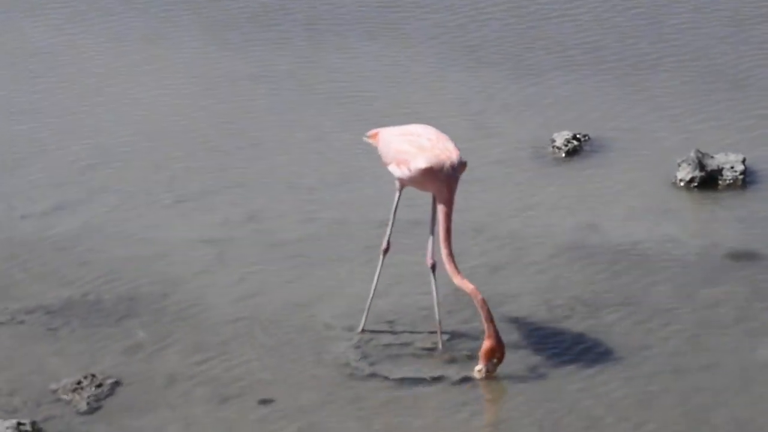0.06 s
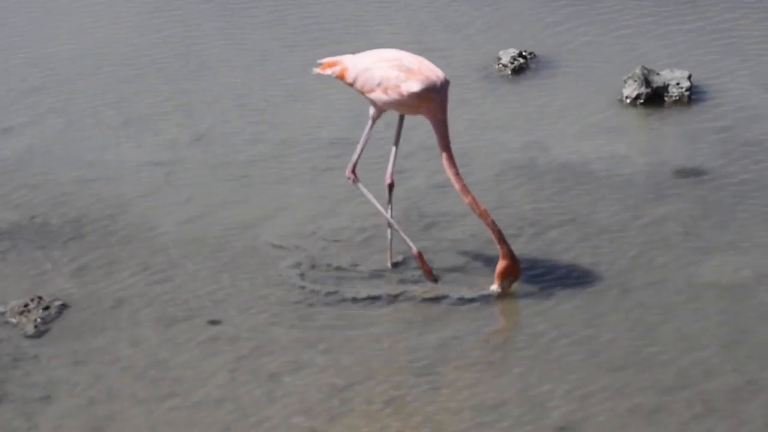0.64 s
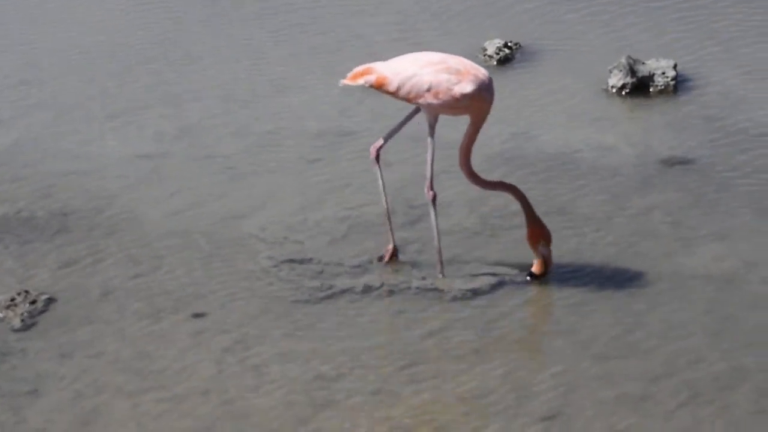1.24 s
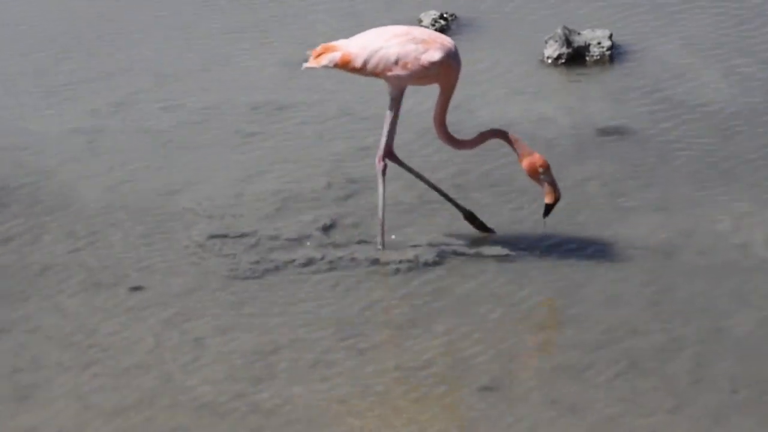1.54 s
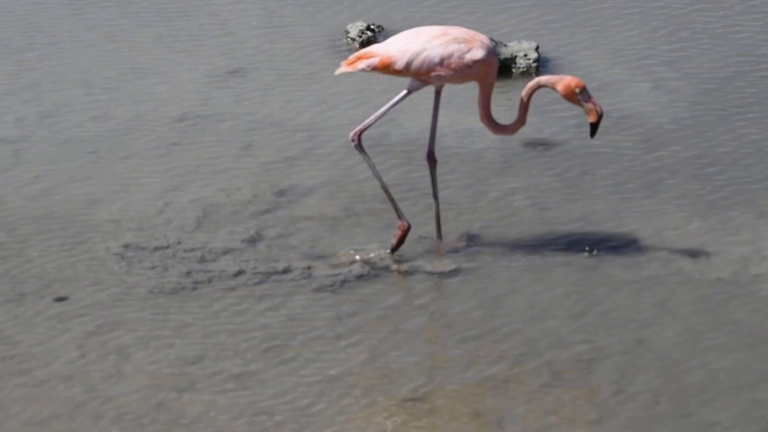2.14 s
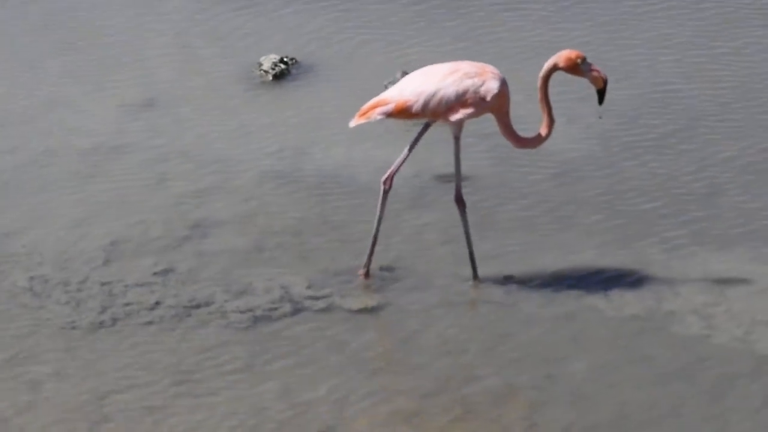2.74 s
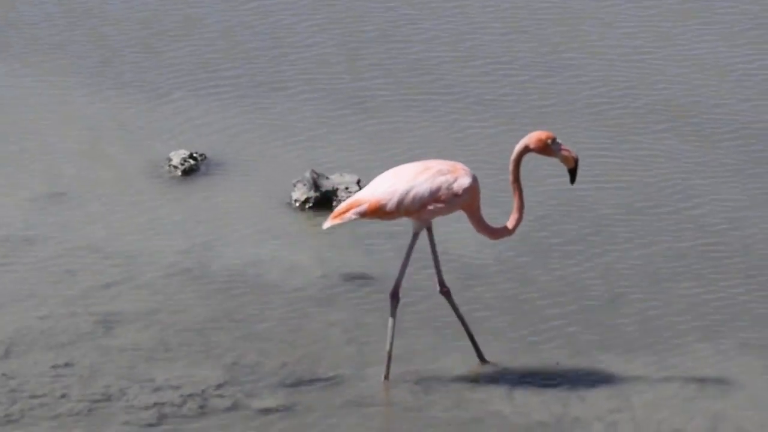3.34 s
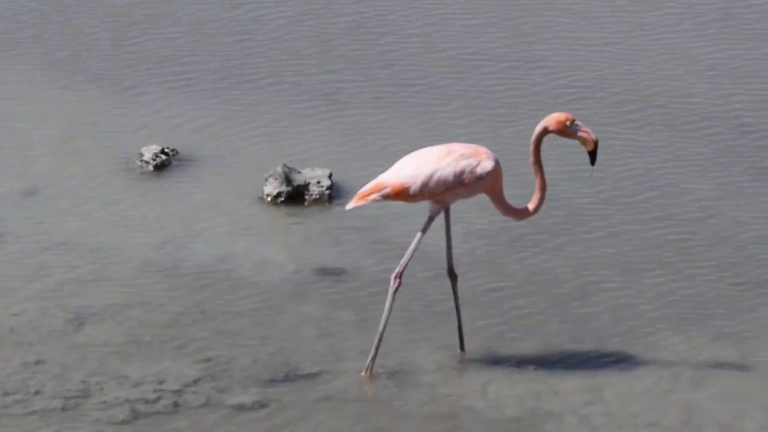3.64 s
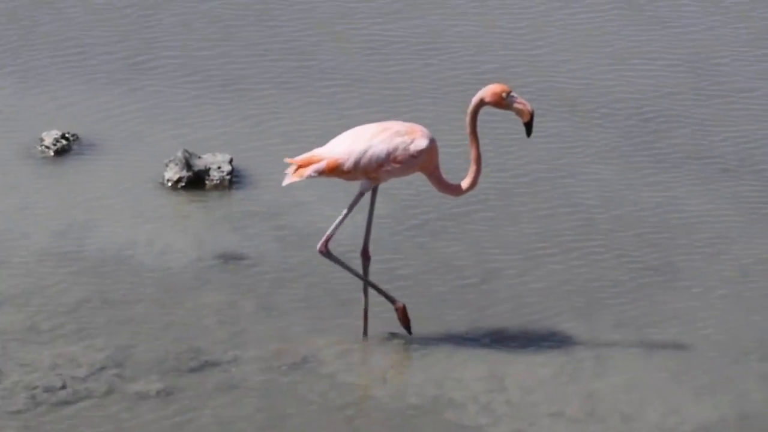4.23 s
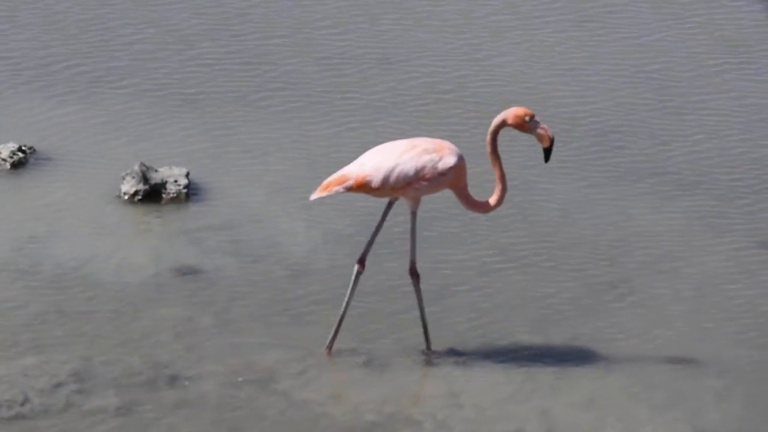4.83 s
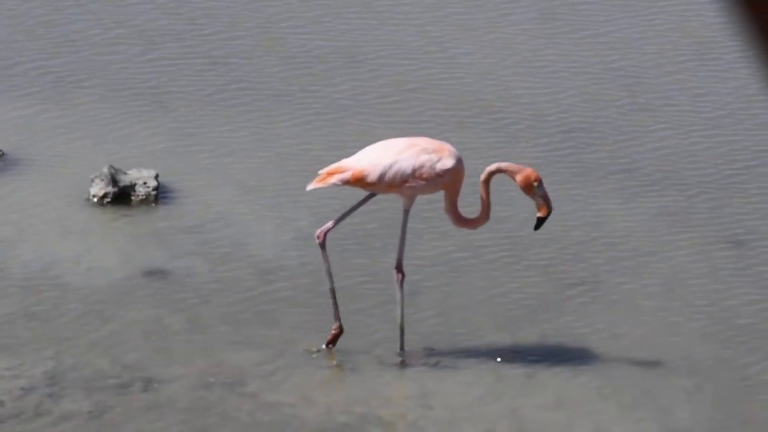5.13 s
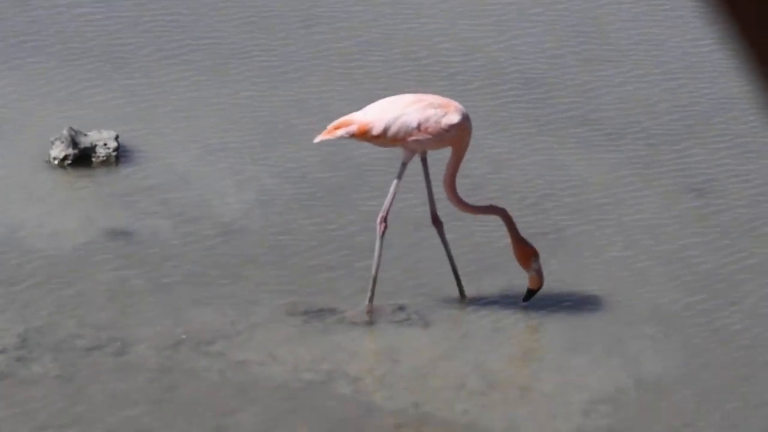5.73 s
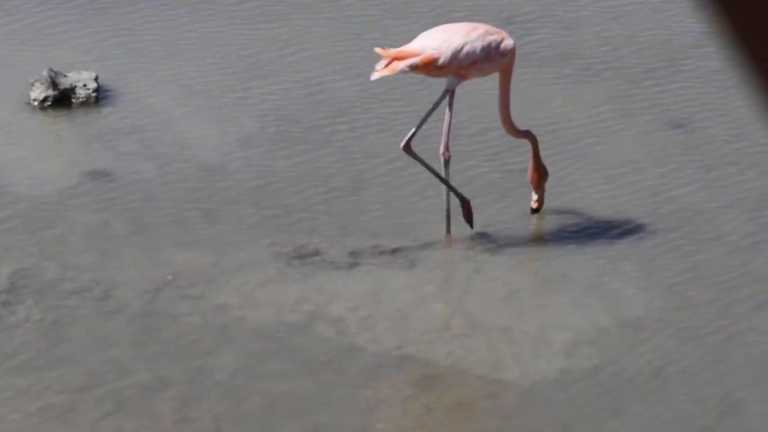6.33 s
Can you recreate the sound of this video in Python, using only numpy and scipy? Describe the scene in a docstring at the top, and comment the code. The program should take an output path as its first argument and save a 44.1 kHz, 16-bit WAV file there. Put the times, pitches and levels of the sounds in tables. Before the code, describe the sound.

Gusty wind buffets the microphone with low rumbles and thumps, with faint clicks and a soft hiss of air over water behind it.

```python
"""Gusty wind right on a camera's two microphone ports, on the shore of a shallow lagoon.
Turbulence rumbles, single eddies thump, and the flow flaps as it tears off a port's edge.
The hardest gust overloads the recorder, so its gain ducks and climbs back.
Close by are a few tiny ticks and the camera's own high whine; farther off, thin bird chips
and the hush of air over rippled water."""
import sys
import numpy as np
from scipy import signal
from scipy.io import wavfile
from scipy.ndimage import uniform_filter1d

SR = 44100
rng = np.random.default_rng(int(sys.argv[2]) if len(sys.argv) > 2 else 0)


def transcribe(signal):
    """Save signal, clipped to [-1, 1], as a 16-bit WAV file at the path in sys.argv[1]."""
    frames = np.atleast_2d(signal).T
    limited = np.clip(frames, -1, 1)
    pcm = np.round(limited * 32767).astype(np.int16)
    wavfile.write(sys.argv[1], SR, pcm)


N = 285768
TIME = np.arange(N) / SR

# gusts reaching the microphone: (start [s], hold [s], wind level [dB])
WIND_GUSTS = [(0.251, 0.075, -30), (0.383, .16, -25.5), (0.63, 0.093, -30.5), (0.792, 0.22, -25.5),
              (1.068, 0.061, -30.5), (1.334, 0.031, -22.5), (1.43, 0.025, -23), (1.496, .13, -21.5),
              (1.648, 0.12, -20.5), (1.787, 0.017, -20), (2.064, 0.07, -23.5), (2.09, 0.092, -21.5),
              (2.408, 0.11, -25.5), (2.547, 0.069, -17), (2.719, .08, -21), (2.807, 0.076, -16),
              (2.897, 0.062, -23), (3.12, 0.24, -21.5), (3.429, 0.053, -28), (3.642, 0.049, -24.5),
              (3.785, 0.039, -27.5), (4.004, .12, -23.5), (4.222, 0.12, -25), (4.31, 0.077, -19),
              (4.427, 0.0088, -18), (4.47, 0.064, -30), (4.598, 0.007, -23.5), (4.701, 0.028, -18),
              (4.758, .05, -26), (4.887, 0.057, -21.5), (5.044, .08, -29.5), (5.172, .14, -24),
              (5.514, 0.035, -27.5), (5.699, 0.014, -28), (5.811, 0.014, -31), (6.105, 0.031, -29),
              (6.298, 0.11, -23.5), (6.463, 0.022, -28)]
# the breeze that never drops: (time [s], wind level before trim [dB])
STEADY_BREEZE = [(0.0, -34.5), (0.41, -33.5), (3.47, -26.5), (4.0, -30.5), (4.24, -29), (6.19, -38),
                 (6.48, -28)]
# spectrum of the large eddies: (frequency [Hz], relative density [dB])
RUMBLE_SPECTRUM = [(20, -13), (35, -20), (60, 1), (100, 3), (150, 4), (220, -4), (300, -20), (450, -21),
                   (800, -61)]
# spectrum of the small eddies: (frequency [Hz], relative density [dB])
FLUTTER_SPECTRUM = [(120, -15), (220, 4.5), (320, -1), (450, -10.5), (650, -24.5), (900, -34),
                    (1400, -26.5), (2500, -68)]
# single eddies hitting a port: (time [s], peak before trim [dB], low-pass [Hz], leftward pan [dB])
EDDY_HITS = [(0.263, -18, 493, 12), (0.29, -15.5, 390, 11), (0.372, -10.5, 576, 13),
             (0.387, -12.5, 545, 16), (0.801, -11, 467, 12), (0.956, -11, 430, 17), (1.35, -13.5, 595, 23),
             (1.518, -11.5, 513, -25), (1.611, -9, 550, 20), (1.662, -9.5, 524, -18), (1.682, -1, 710, -10),
             (1.693, -1.5, 395, 9), (1.751, -5.5, 646, -16), (1.759, -9, 500, -10),
             (1.884, -3.5, 440.6, 13), (1.96, -15, 347, 14), (2.117, -8.5, 487, -15),
             (2.171, -8.5, 524, 14), (2.48, -14, 510, -18), (2.558, -9.5, 367, -18),
             (2.589, -14.5, 690, -24), (2.822, -4.5, 640, 17), (2.86, 2, 820, 14), (2.871, 10.5, 800, -27),
             (2.88, 5, 810, -13), (3.145, -16, 475, 16), (3.212, -7.5, 322, 13), (3.301, -4, 223, -16),
             (3.384, -13.5, 425, -22), (3.529, -12.5, 235, 9), (3.647, -10, 350, 15),
             (4.024, -16.5, 328, -16), (4.324, -2.5, 342, 7), (4.436, -6.5, 466, -17),
             (4.516, -12, 340, 13), (4.735, -.5, 580, 21), (4.908, -8, 640, -12), (5.287, -4, 433, -15),
             (5.569, -16, 360, 12), (5.809, -18, 402, 7), (6.362, -1.5, 480, 19), (6.41, -6, 615, 19)]
# flow tearing off a port's edge: (middle [s], length [s], rms ahead of the ports [dB], top [Hz])
EDGE_FLAPS = [(0.372, 0.0081, -32, 706), (0.815, .017, -21.5, 1060), (1.547, 0.013, -18, 655),
              (1.6852, 0.0021, -8.5, 1650), (1.751, 0.0073, -20, 890), (1.885, 0.0024, -28.5, 2390),
              (2.115, 0.018, -21, 835), (2.167, 0.012, -24, 760), (2.608, 0.0036, -13, 1030),
              (2.82, 0.01, -14, 1610), (2.861, 0.0025, -6.5, 2170), (2.871, 0.003, -2, 2330),
              (2.8795, 0.0031, -1, 3340), (2.8817, 0.0039, 9, 1500), (3.674, 0.0067, -16.5, 940),
              (4.366, 0.038, -17.5, 776), (4.438, 0.0031, -16, 1065), (4.734, 0.0042, -12.5, 1850),
              (4.775, 0.016, -21.5, 950), (4.914, 0.023, -24, 670), (5.288, .007, -20.5, 1125),
              (6.359, 0.0016, -12, 1210), (6.38, 0.018, -15, 1400), (6.413, 0.0031, -13.5, 1160)]
# ticks close to the microphone: (time [s], peak [dB], centre [Hz], leftward pan [dB])
NEAR_TICKS = [(0.171, -36.5, 7350, 5), (0.424, -37.5, 9500, -7), (0.622, -41, 9550, -9),
              (0.691, -36.5, 4860, -2), (1.239, -40.5, 7660, 6), (1.962, -38, 7500, 6),
              (2.179, -32.5, 8370, -2), (2.681, -38, 8300, -1), (2.786, -42, 8000, 0),
              (3.031, -35.5, 7150, 2), (5.327, -41, 6500, -5), (5.461, -44, 1890, -13),
              (6.076, -40, 7600, 2), (6.317, -43, 9500, -5)]
# birds farther off: (time [s], length [s], pitch [Hz], level [dB])
BIRD_CHIPS = [(0.016, 0.032, 6100, -56), (0.149, .05, 8620, -49.5), (2.582, 0.03, 8700, -49.5),
              (4.947, 0.039, 8120, -45.5), (5.59, .09, 7860, -65), (5.79, .07, 7900, -64)]
# spectrum of air and rippled water: (frequency [Hz], relative density [dB])
HUSH_SPECTRUM = [(100, -50), (200, -14), (400, 4), (800, 6.5), (1300, 2), (2100, -1), (3200, -7),
                 (5500, -8), (7300, -16), (9000, -11.5), (11000, -18.5), (15000, -17)]
# narrow colours in the hiss: (centre [Hz], width [Hz], rms before lift [dB])
HISS_BANDS = [(4600, 180, -70.5), (9110, 940, -66.5)]
# the lagoon heard from the shore: (time [s], hush level [dB], lift of the hiss bands [dB])
LAGOON_LEVELS = [(0, -49, 4.5), (0.7, -48, 3), (1.3, -50, 5), (2.2, -49, 4), (2.7, -47, 5.5), (3.5, -50, 3),
                 (4.4, -49, 2.5), (5.3, -50, 3.5), (5.6, -49.5, 7), (5.9, -48, 4.5), (6.1, -51, 3.5),
                 (6.48, -50, 4)]
# the camera's whine in its own microphone: (time [s], left peak [dB], right peak [dB])
WHINE_LEVELS = [(0, -59, -39.5), (1.1, -64, -42.5), (2.2, -58, -42.5), (2.7, -56, -39.5), (3.2, -54, -39.5),
                (4.2, -62, -43.5), (4.8, -59, -41.5), (5.7, -60, -48), (5.9, -58, -42.5),
                (6.48, -52, -42.5)]


def turbulence(rumble_trim_db=1.5, flutter_base_db=-31, flutter_growth=1.3, typical_gust_db=-24):
    """Wind on the microphone: large eddies rumble; small ones come in lumps and wander between ports."""
    rumble_db = wind_db() + 3.5 * np.tanh(drift(12))
    # small eddies grow faster with the wind than the rumble does
    flutter_db = flutter_base_db + flutter_growth * (rumble_db - typical_gust_db)
    lumps = np.tanh(drift(45))
    rumble = evened(coloured(RUMBLE_SPECTRUM)[0] * from_db(5 * lumps), span_s=0.065)
    flutter = evened(coloured(FLUTTER_SPECTRUM)[0] * from_db(14 * lumps), span_s=0.035)
    pressure = from_db(rumble_db + rumble_trim_db) * rumble + from_db(flutter_db) * flutter
    pressure = filtered(pressure, "low", 1300, order=4)  # the smallest eddies cancel across the opening
    return at_ports(pressure, pan_db=12 * drift(12.6))


def wind_db(attack_s=0.014, release_s=0.026, breeze_trim_db=-4.5):
    """Wind level at the camera: each gust swells, holds and dies back to the breeze."""
    t = TIME[::64]
    start, hold, db = np.transpose(WIND_GUSTS)[:, :, None]
    fade = np.maximum(start - t, 0) / attack_s + np.maximum(t - start - hold, 0) / release_s
    gust_db = np.max(db - 20 / np.log(10) * fade, axis=0)
    breeze_db, = in_time(STEADY_BREEZE)
    return np.maximum(breeze_db + breeze_trim_db, np.interp(TIME, t, gust_db))


def eddies(leak_hz=125, inertia_hz=200, trim_db=0.5, neighbour_db=-10, spacing_s=0.006905):
    """Thumps on a port: each is a pressure kick with a rebound, with a weaker eddy before and after."""
    out = np.zeros((2, N))
    kick = filtered(signal.unit_impulse(2048), "high", leak_hz)
    push = filtered(kick, "low", inertia_hz, order=1)
    signs = rng.choice([-1, 1], (len(EDDY_HITS), 3))
    lags = spacing_s * rng.uniform(.5, 1.5, (len(EDDY_HITS), 3)) * np.array([-1, 0, 1])
    sizes = from_db([neighbour_db, 0, neighbour_db])
    for (s, db, sharp_hz, pan_db), row_signs, row_lags in zip(EDDY_HITS, signs, lags):
        pulse = filtered(push, "low", sharp_hz, order=4)
        start = s - np.abs(pulse).argmax() / SR
        thump = at_ports(from_db(db + trim_db) * pulse / np.abs(pulse).max(), pan_db)
        for size, lag in zip(row_signs * sizes, row_lags):
            add(out, start + lag, size * thump)
    return out


def flaps(low_ratio=0.21, pan_db=14.5):
    """Flow tears off a port's edge in a few uneven swings of like height, some dull, some bright."""
    out, t = np.zeros((2, N)), TIME[:8192] - TIME[4096]
    for s, length, db, top_hz in EDGE_FLAPS:
        low_hz = top_hz * low_ratio
        swings = filtered(rng.standard_normal(len(t)), "band", [low_hz, top_hz])
        swings = evened(filtered(swings, "low", low_hz, order=1), span_s=0.0033)
        window = np.exp(-np.abs(2 * t / length) ** 4 / 2)
        flap = window * filtered(swings, "low", top_hz, order=6)
        flap *= from_db(db) * np.linalg.norm(window) / np.linalg.norm(flap)
        add(out, s + t[0], at_ports(flap, pan_db * port_hit(s)))
    return out


def port_hit(s):
    """The port that the eddy nearest in time hits: 1 left, -1 right."""
    times, *_, pans = np.transpose(EDDY_HITS)
    return np.sign(pans[np.abs(times - s).argmin()])


def at_ports(pressure, pan_db, split_hz=650):
    """Both ports share the bass; eddies smaller than the gap between them favour the port they hit."""
    bass = filtered(pressure, "low", split_hz, order=1)
    bass = filtered(bass[::-1], "low", split_hz, order=1)[::-1]  # backwards, to cancel the phase lag
    fine = pressure - bass
    return pressure + fine * (panned(pan_db) - 1.5)


def ticks(decay_s=0.0012, band_ratio=1.17):
    """Dry, bright ticks close to the microphone, a millisecond or two long."""
    out, t = np.zeros((2, N)), TIME[:1024]
    for s, db, hz, pan_db in NEAR_TICKS:
        burst = rng.standard_normal((2, len(t))) * np.exp(-t / decay_s)
        tick = filtered(burst, "band", [hz / band_ratio, hz * band_ratio])
        tick /= np.abs(tick.mean(axis=0)).max()
        add(out, s, from_db(db) * tick * panned(pan_db))
    return out


def birds(hook=0.057, hook_s=0.0051, waver=.014, echo_db=-7, echo_decay_s=.07):
    """Thin, distant chips that hook down onto their pitch and scatter back from the shore."""
    chips, wobble = np.zeros((2, N)), waver * drift(150)
    for s, length, hz, db in BIRD_CHIPS:
        t = TIME[:int(length * SR)]
        pitch = hz * (1 + hook * np.exp(-t / hook_s) + np.interp(s + t, TIME, wobble))
        envelope = np.sqrt(np.abs(np.sin(np.pi * t / length)))
        add(chips, s, from_db(db) * envelope * np.sin(2 * np.pi * np.cumsum(pitch) / SR))
    scatter = rng.standard_normal((2, SR // 2)) * np.exp(-TIME[:SR // 2] / echo_decay_s)
    echo = signal.fftconvolve(chips, scatter / np.linalg.norm(scatter[0]), axes=1)[:, :N]
    return chips + from_db(echo_db) * echo


def lagoon(shared_power=0.075, hush_pan_db=-2, hiss_pan_db=-5):
    """Wide, even hush of air over rippled water, a little to the right, with two narrow bands of hiss."""
    hush_db, lift_db = in_time(LAGOON_LEVELS)
    left, right, both = coloured(HUSH_SPECTRUM, channels=3)
    hush = np.sqrt(1 - shared_power) * np.array([left, right]) + np.sqrt(shared_power) * both
    out = from_db(hush_db) * hush * panned(hush_pan_db)
    for hz, width, db in HISS_BANDS:
        band = filtered(rng.standard_normal((2, N)), "band", [hz - width / 2, hz + width / 2], order=1)
        out += from_db(db + lift_db) * rms_one(band) * panned(hiss_pan_db)
    return out


def whine(hz=15678.6, waver_db=1.0):
    """A steady tone from the camera's electronics, mostly in the right channel."""
    level_db = np.array(in_time(WHINE_LEVELS)) + waver_db * drift(15)
    return from_db(level_db) * np.sin(2 * np.pi * hz * TIME)


def from_db(db):
    """Decibels to gain."""
    return 10 ** (np.asarray(db) / 20)


def rms_one(x):
    """Scale to unit rms."""
    return x / np.sqrt(np.mean(x ** 2) + 1e-20)


def in_time(rows):
    """Each column of a curve at every sample."""
    s, *columns = np.transpose(rows)
    return [np.interp(TIME, s, c) for c in columns]


def filtered(x, kind, hz, order=2):
    """Causal Butterworth filter."""
    return signal.sosfilt(signal.butter(order, np.clip(hz, 10, .45 * SR), kind, fs=SR, output="sos"), x)


def drift(rate_hz):
    """Random wander of unit rms, mostly slower than rate_hz."""
    step = 40  # samples per drawn value
    pole = np.exp(-2 * np.pi * rate_hz * step / SR)
    white = rng.standard_normal(N // step + 2002)
    slow = signal.lfilter([1], [1, -2 * pole, pole * pole], white)[2000:]
    return np.interp(np.arange(N) / step, np.arange(len(slow)), rms_one(slow))


def coloured(spectrum, channels=1):
    """Noise of unit rms from half-octave bands that follow a spectrum."""
    hz, db = np.transpose(spectrum)
    edges = 18 * 2 ** np.arange(0, 10.1, .5)
    white, out = rng.standard_normal((2, channels, N)), 0
    for k, (low, high) in enumerate(zip(edges, edges[1:])):
        if high > hz[0] and low < hz[-1]:
            gain = from_db(np.interp(np.log(low * high) / 2, np.log(hz), db))
            out = out + gain * filtered(white[k % 2], "band", [low, high])
    return rms_one(out)


def evened(x, span_s):
    """Take slow swells out of a noise and keep its fast lumps."""
    size = max(int(span_s * SR), 2)
    return x / np.sqrt(uniform_filter1d(uniform_filter1d(x ** 2, size), size) + 1e-6)


def add(track, s, sound):
    """Mix a sound in at time s."""
    at = max(round(s * SR), 0)
    track[:, at:at + sound.shape[-1]] += sound[..., :N - at]


def panned(pan_db):
    """Left and right gains around a mean of 1; positive is to the left."""
    gains = from_db(np.array([[.5], [-.5]]) * pan_db)
    return gains / gains.mean()


def scene():
    """Wind on the microphone, with the quiet shore behind it."""
    return turbulence() + eddies() + flaps() + lagoon() + ticks() + birds() + whine()


def ducking(x, threshold_db=-31, depth_db=10, release_db_per_s=80, delay_s=.009):
    """The recorder's gain control: a harsh overload pulls it down a moment later, then it climbs back."""
    treble_power = np.mean(filtered(x, "high", 1600, order=4) ** 2, axis=0)
    treble_db = 10 * np.log10(np.abs(filtered(treble_power, "low", 8, order=1)) + 1e-12)
    cut_db = np.clip(3 * (treble_db - threshold_db), 0, depth_db)
    recovery_db = release_db_per_s * TIME
    cut_db = np.maximum.accumulate(cut_db + recovery_db) - recovery_db
    cut_db = filtered(cut_db, "low", 120, order=1)
    return from_db(-np.interp(TIME - delay_s, TIME, cut_db))


def record(dry):
    """The camera's input clips at full scale, its gain ducks after overload, and the top is cut."""
    clipped = np.clip(dry, -1, 1)
    top_cut = signal.ellip(12, .1, 80, 16100, fs=SR, output="sos")
    return signal.sosfilt(top_cut, clipped * ducking(clipped))


dry = scene()
out = record(dry)
transcribe(out)
```